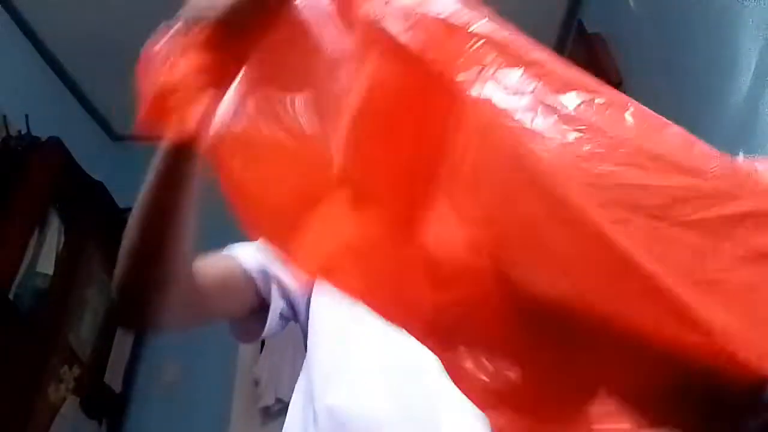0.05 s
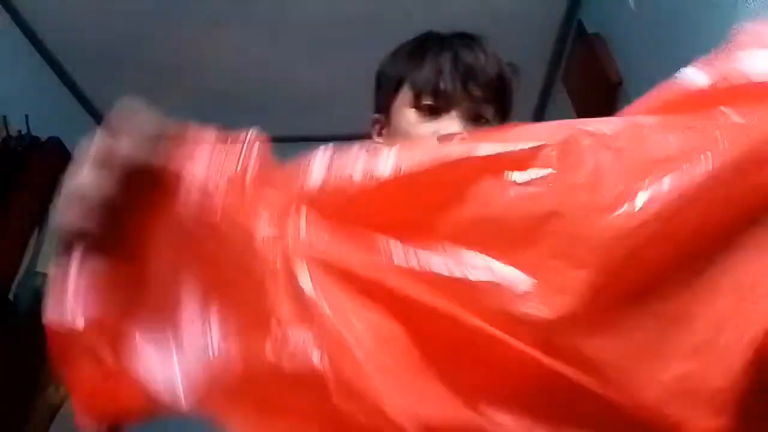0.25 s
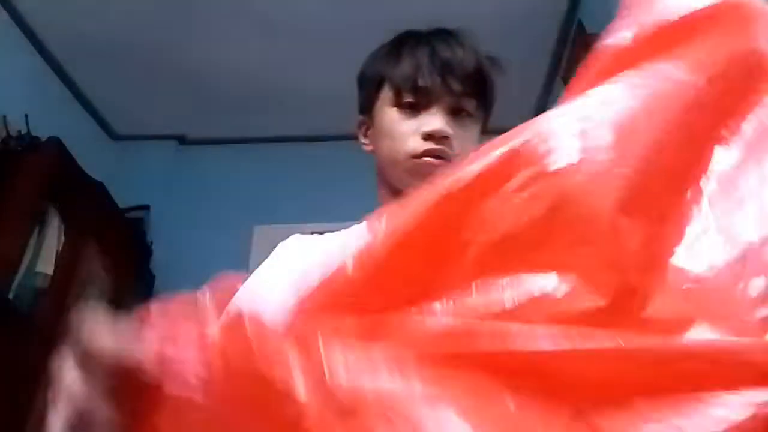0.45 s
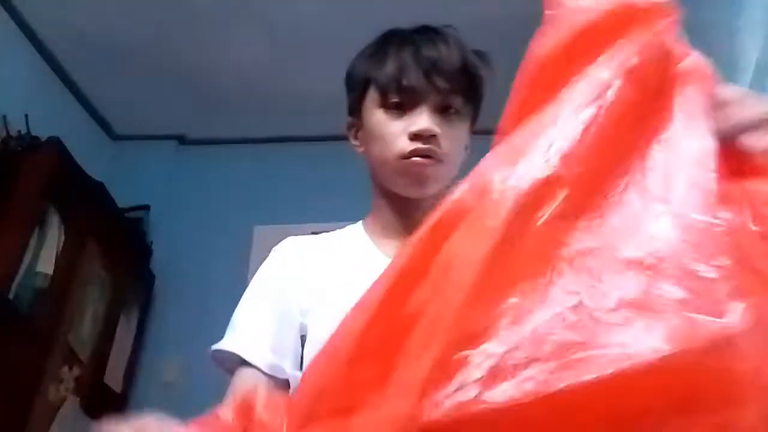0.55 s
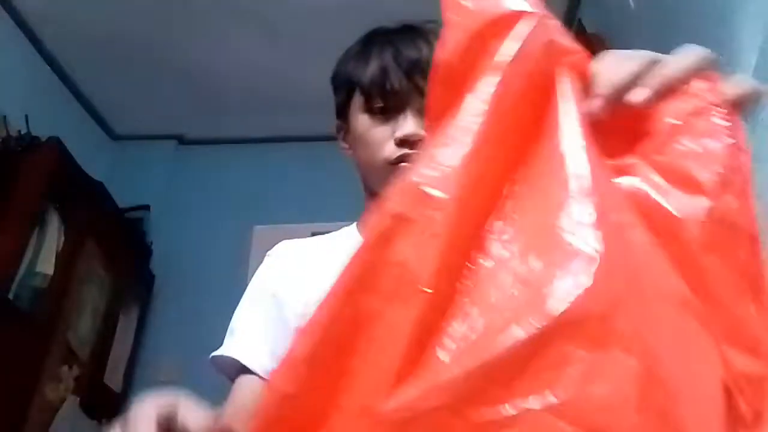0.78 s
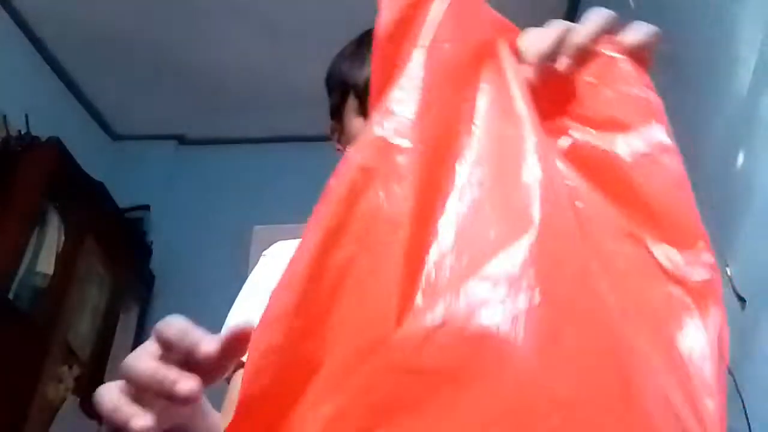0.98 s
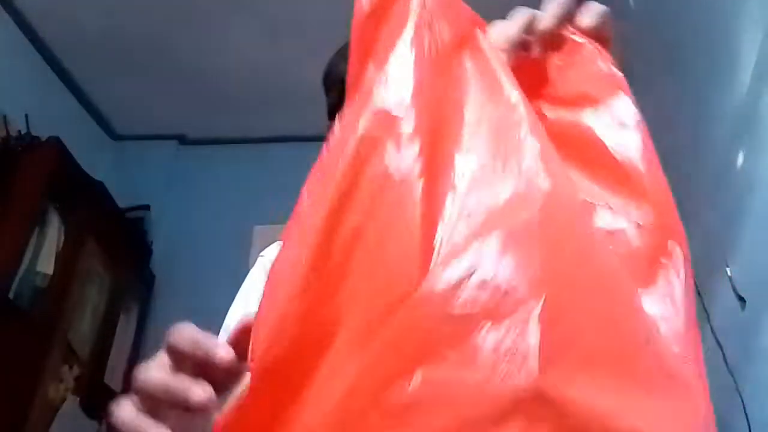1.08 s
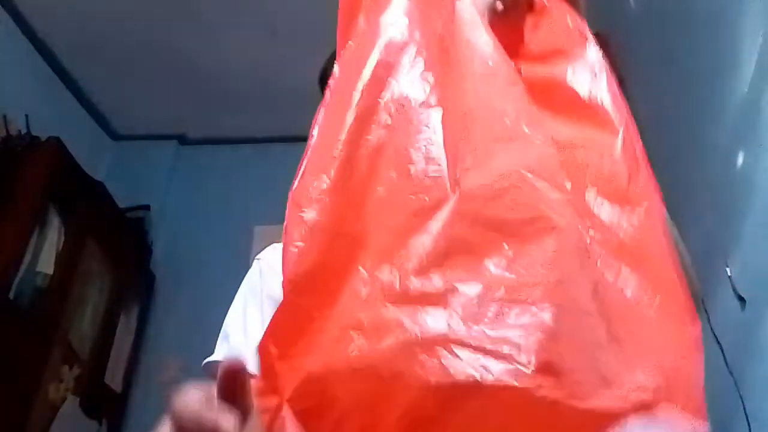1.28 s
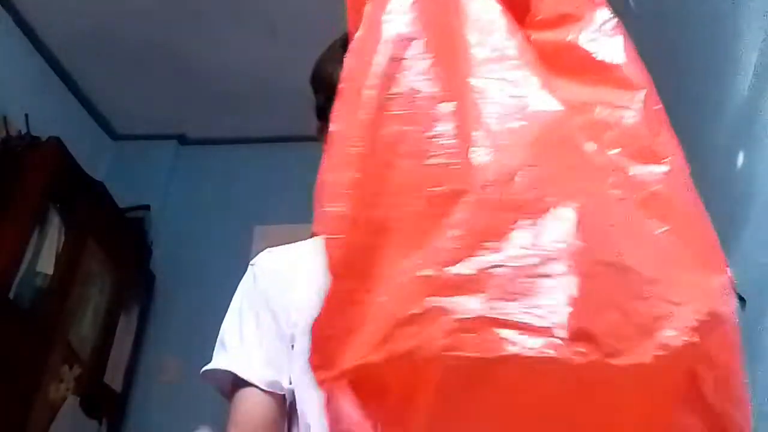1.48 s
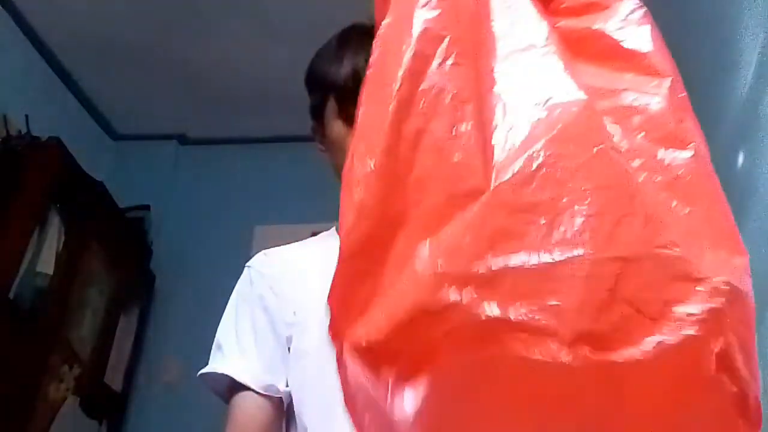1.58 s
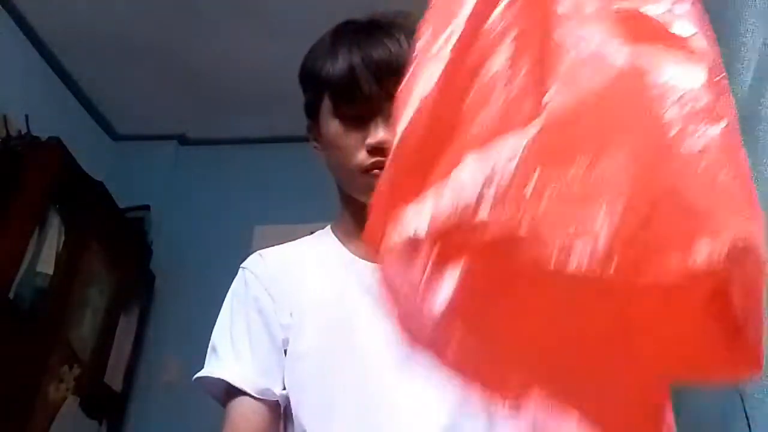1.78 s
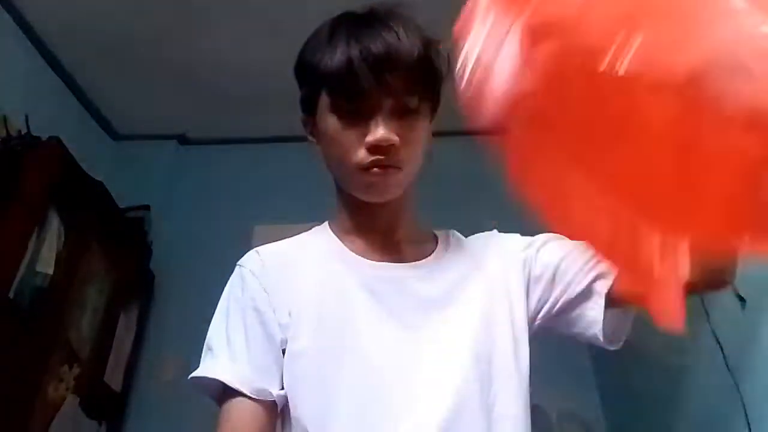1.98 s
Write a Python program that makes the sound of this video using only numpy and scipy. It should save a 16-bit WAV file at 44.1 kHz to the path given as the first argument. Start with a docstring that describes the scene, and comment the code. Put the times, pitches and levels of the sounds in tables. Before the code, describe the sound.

Large thin plastic bag rustled and snapped taut close to the microphone in a small room

```python
"""Thin plastic bag handled up close

A large thin plastic bag is swung, pulled open and lifted away close to the microphone in a small quiet room.
Showers of filtered noise grains make the rustle and crackle; single grains make sharp ticks.
Snapping panels are decaying sines that fall in pitch, each with a noise crack; low sines thump as the sheet flaps.
Low noise makes the puffs of air and the room rumble, a sine the hum; sparse decaying taps make the room answer."""
import sys
import numpy as np
from scipy import signal
from scipy.io import wavfile

SR = 44100
rng = np.random.default_rng(int(sys.argv[2]) if len(sys.argv) > 2 else 0)


def master_out(mix):
    """Clip the mix to full scale and print it as 16-bit PCM to the path in sys.argv[1]."""
    frames = np.transpose(np.atleast_2d(mix))
    ceiling = np.clip(frames, -1, 1)
    pcm = np.round(ceiling * 32767).astype(np.int16)
    wavfile.write(sys.argv[1], SR, pcm)


N = 90404

# Level tables are interpolated over time; spectra are relative, as their filters are scaled to unit energy.
# room rumble spectrum: freq_hz, density_db
RUMBLE_SPECTRUM = [(15, -15.5), (55, 0.5), (110, -0.5), (170, -8), (1000, -29), (4000, -42), (16000, -69)]
# hum: time_s, level_db
HUM_LEVEL = [(1.8, -58), (2.05, -44.5)]
# air pushed by the sheet: time_s, level_db
AIR_LEVEL = [(0, -57), (.21, -39.5), (.3, -51.5), (.35, -37), (.40, -59), (.475, -37.5), (.55, -41),
             (.62, -37), (.75, -37.5), (.83, -43.5), (1.22, -55.5), (1.36, -37), (1.41, -49), (1.46, -50),
             (1.53, -38), (1.68, -50)]
# air puff spectrum: freq_hz, density_db
PUFF_SPECTRUM = [(10, -10), (48, -0.5), (125, 0.5), (220, -15.5), (1500, -77.5)]
# room decay to -60 dB: freq_hz, t60_s
ROOM_DECAY = [(100, 0.17), (500, 0.48), (4000, 0.22)]
# room reflection spectrum: freq_hz, gain_db
ROOM_SPECTRUM = [(60, 2), (700, -0.5), (2400, -1), (6000, -10), (16000, 1.5)]
# handling of the bag, before the layer gains: time_s, rustle_relative_db, crackle_relative_db
HANDLING_LEVEL = [(0, -43.5, -53), (.12, -42.5, -54.5), (.21, -41.5, -39), (.30, -42.5, -50.5),
                  (.40, -39.5, -47.5), (.46, -31.5, -40), (.50, -36, -47.5), (.56, -34, -40),
                  (.615, -31, -38.5), (.645, -36.5, -38.5), (.68, -26.5, -39), (.73, -42.5, -47),
                  (.77, -51, -40), (.82, -44.5, -52.5), (.93, -39.5, -47), (1.0, -47.5, -47.5),
                  (1.13, -43.5, -47), (1.21, -48, -48), (1.3, -40.5, -49), (1.38, -43.5, -62),
                  (1.49, -47.5, -69), (1.55, -58.5, -63), (1.70, -69, -81.5), (1.80, -65, -80.5),
                  (1.835, -49.5, -65.5), (1.855, -67.5, -88.5), (2.05, -75, -100)]
# broad fold spectrum: freq_hz, density_db
RUSTLE_SPECTRUM = [(110, -6.5), (260, 3.5), (450, -3), (1150, -6), (1600, -3.5), (3400, -9), (4500, -24.5),
                   (7000, -24.5), (16000, -52.5)]
# fine wrinkle spectrum: freq_hz, density_db
CRACKLE_SPECTRUM = [(500, 10.5), (2000, 9), (4000, 6), (7000, -6.5), (8200, 1), (11000, -17), (13200, -23),
                    (15500, -11)]
# single creases flipping: start_s, level_db
TICK_EVENTS = [(0.134, -23.5), (0.176, -34), (0.1875, -31), (0.2131, -22), (0.2197, -28), (0.2487, -34),
               (0.2628, -25), (0.276, -29.5), (.388, -29), (0.438, -39), (.52, -27), (0.9106, -28.5),
               (0.919, -27.5), (1.0607, -26.5), (1.0993, -30), (1.229, -32), (1.5131, -39), (1.5405, -49),
               (1.7352, -51)]
# crease flip spectrum: freq_hz, density_db
TICK_SPECTRUM = [(200, -7), (1200, 13), (6500, -2.5), (8200, -4), (13000, -17), (15500, -9.5)]
# whole sheet flapping: start_s, level_db, pitch_hz
FLAP_EVENTS = [(0.679, -25, 282), (0.746, -19.5, 250), (1.2915, -24, 300), (1.356, -19, 301),
               (1.364, -28, 179), (1.401, -27, 56)]
# shaken film spectrum: freq_hz, density_db
SETTLE_SPECTRUM = [(100, -2), (400, 0), (1100, -2.5), (2000, 3), (3000, -8.5), (15000, -45)]
# panels snapping taut: start_s, pop_level_db, final_pitch_hz, ring_ms (to 1/e), crack_level_db
SNAP_EVENTS = [(0.3489, -26, 1340, 3.2, -25), (.605, -21, 1870, 0.54, -26), (0.6184, -23, 2330, 1.5, -23),
               (0.6761, -4.5, 1820, 1.5, -11.5), (0.6819, -9.5, 1630, 1.4, -27),
               (0.6993, -9, 1360, 1.2, -35), (0.7411, -12, 920, 1.5, -32), (0.7422, -9, 1410, 1.8, -12.5),
               (0.747, -1.5, 2300, 0.81, -12.5), (0.7482, 3, 1413, 1.54, -21),
               (0.7632, -12.5, 2570, 1.8, -24), (0.842, -24, 1600, 1.2, -28), (0.845, -28, 1950, 1, -24),
               (1.239, -23.5, 1620, 2.4, -40), (1.290, -6.5, 1280, 0.46, -25),
               (1.3317, -12, 1330, 0.3, -39), (1.3405, -18.5, 1100, 0.62, -35.5),
               (1.354, -7, 1630, 1.2, -19), (1.356, -11, 890, 1.45, -43), (1.375, -21, 1630, 2.7, -45),
               (1.3835, -24, 1730, 3.7, -32), (1.427, -18, 900, 0.77, -28), (1.44, -27, 2900, 2.2, -35),
               (1.4477, -28, 1440, 4.8, -32), (1.5183, -16, 1500, 2.4, -17), (1.531, -10, 1050, 0.62, -25),
               (1.6033, -34, 473, 2.8, -47), (1.66, -43, 850, 2.3, -54), (1.877, -43.5, 850, 2.15, -56),
               (1.9848, -44, 1740, 2.6, -47.5)]
# snap crack spectrum: freq_hz, density_db
CRACK_SPECTRUM = [(100, -30), (400, -1), (800, 4), (2000, 1), (5000, -11.5), (6500, -26.5), (8300, -19.5),
                  (12000, -44)]

# Decay, grain and sag times are to 1/e.
RUMBLE_DB, HUM_HZ = -50.5, 144.3
ROOM_DB, ROOM_DELAY_S, ROOM_TAPS_PER_S = -13, 0.010, 3000
POP_ROOM_DB = -7  # pops are aimed at the microphone and stir the room less
NEAR_DB, NEAR_DECAY_S = -5, 0.00078
RUSTLE_PER_S, RUSTLE_SPREAD_DB, RUSTLE_GRAIN_S, RUSTLE_GAIN_DB = 4200, 4.5, 0.00051, 3
CRACKLE_PER_S, CRACKLE_SPREAD_DB, CRACKLE_GRAIN_S, CRACKLE_GAIN_DB = 2600, 3.5, 0.00022, 5
SETTLE_PER_S, SETTLE_SPREAD_DB, SETTLE_GRAIN_S = 1300, 5, 0.00075
SETTLE_GAIN_DB, SETTLE_DECAY_S = -23, 0.021
TICK_DECAY_S, CRACK_DECAY_S, POP_RISE_S = 0.002, 0.0027, 0.000067
THUMP_DECAY_CYCLES = 1.46
POP_SHARP_RATIO, POP_SAG_S = 0.16, 0.00083  # initial pitch excess, lost as the tension lets go
CUT_HZ = 15700


def amp(db):
    """Decibels to gain."""
    return 10 ** (np.asarray(db) / 20)


def unit(x):
    """Scales to rms 1."""
    return x / np.sqrt(np.mean(x ** 2) + 1e-20)


def at_hz(points, hz):
    """Interpolates a frequency table on a log-frequency axis."""
    freq_hz, value = np.transpose(points)
    return np.interp(np.log(hz + 1), np.log(freq_hz + 1), value)


def level(table, axis):
    """Gain over time from one dB column of a table."""
    rows = np.array(table)
    time_s = np.arange(N) / SR
    return amp(np.interp(time_s, rows[:, 0], rows[:, axis]))


def add(mix, start_s, sound):
    """Mixes a sound in at start_s."""
    start = max(round(start_s * SR), 0)
    part = mix[start:][:len(sound)]
    part += sound[:len(part)]


def colour(x, points, size=8192):
    """Minimum-phase filter of unit energy with the given spectrum."""
    hz = abs(np.fft.fftfreq(size, 1 / SR))
    log_gain = np.log(amp(at_hz(points, hz)))
    response = np.exp(np.conj(signal.hilbert(log_gain)))
    taps = np.fft.ifft(response).real[:size // 2]
    return signal.fftconvolve(x, taps / np.linalg.norm(taps))[:len(x)]


def bursts(count, decay_s, size=1024):
    """Short random rattles of film: decaying noise, each different, all of the same energy."""
    fade = np.exp(-np.arange(size) / SR / decay_s)
    noise = rng.standard_normal((count, size)) * fade
    return noise * np.linalg.norm(fade) / np.linalg.norm(noise, axis=1, keepdims=True)


def creases(per_s, spread_db, grain_s, spectrum, count=32):
    """A shower of tiny bucklings, many small and a few large, drawing on a set of different grains."""
    size_db = spread_db * np.minimum(rng.exponential(1, N), 4.5)
    sizes = amp(size_db) * (rng.random(N) < per_s / SR)
    which = rng.integers(0, count, N)
    shower = np.zeros(N)
    for k, grain in enumerate(bursts(count, grain_s)):
        shower += signal.oaconvolve(sizes * (which == k), grain)[:N]
    return unit(colour(shower, spectrum))


def background():
    """Low room rumble from filtered noise, with a faint steady-pitched hum that rises at the end."""
    rumble = unit(colour(rng.standard_normal(N), RUMBLE_SPECTRUM))
    hum = unit(np.sin(2 * np.pi * HUM_HZ * np.arange(N) / SR))
    return amp(RUMBLE_DB) * rumble + level(HUM_LEVEL, axis=1) * hum


def room(x, size=256):
    """Small-room reflections: sparse random taps, each frequency fading at its own rate, mids longest."""
    taps = rng.standard_normal(SR // 2) * (rng.random(SR // 2) < ROOM_TAPS_PER_S / SR)
    hz, time_s, bins = signal.stft(taps, SR, nperseg=size)
    fade_db = -60 * time_s / at_hz(ROOM_DECAY, hz)[:, None]
    faded = signal.istft(bins * amp(fade_db), SR, nperseg=size)[1]
    tail = colour(faded, ROOM_SPECTRUM)
    out = np.zeros(N)
    add(out, ROOM_DELAY_S, signal.fftconvolve(x, tail / np.linalg.norm(tail)))
    return out


def near_echoes(x):
    """The body and the wall close by scatter each snap within a few milliseconds."""
    taps = bursts(count=1, decay_s=NEAR_DECAY_S)[0]
    return signal.fftconvolve(x, taps / np.linalg.norm(taps))[:N]


def air():
    """The swinging sheet fans air at the microphone: low noise in puffs."""
    return unit(colour(rng.standard_normal(N), PUFF_SPECTRUM)) * level(AIR_LEVEL, axis=1)


def rustle():
    """Broad folds rustle dully and fine wrinkles crackle as the hands move the bag."""
    folds = creases(RUSTLE_PER_S, RUSTLE_SPREAD_DB, RUSTLE_GRAIN_S, RUSTLE_SPECTRUM)
    folds *= level(HANDLING_LEVEL, axis=1)
    wrinkles = creases(CRACKLE_PER_S, CRACKLE_SPREAD_DB, CRACKLE_GRAIN_S, CRACKLE_SPECTRUM)
    wrinkles *= level(HANDLING_LEVEL, axis=2)
    return amp(RUSTLE_GAIN_DB) * folds + amp(CRACKLE_GAIN_DB) * wrinkles


def ticks():
    """Single stiff creases flip with a bright click."""
    out = np.zeros(N)
    for (start_s, level_db), tick in zip(TICK_EVENTS, bursts(len(TICK_EVENTS), TICK_DECAY_S)):
        add(out, start_s, amp(level_db) * tick)
    return colour(out, TICK_SPECTRUM)


def flaps(size=4096):
    """The whole sheet is stopped short and gives a soft low thump, a sine that dies in a few cycles."""
    t, out = np.arange(size) / SR, np.zeros(N)
    for start_s, level_db, pitch_hz in FLAP_EVENTS:
        fade = np.exp(-pitch_hz * t / THUMP_DECAY_CYCLES)
        add(out, start_s, amp(level_db) * np.sin(2 * np.pi * pitch_hz * t) * fade)
    return out


def settling():
    """After each snap the shaken film crackles on and dies away; overlapping powers add."""
    t, power = np.arange(SR // 2) / SR, np.zeros(N)
    for start_s, pop_db, *_ in SNAP_EVENTS:
        add(power, start_s, (amp(pop_db) * np.exp(-t / SETTLE_DECAY_S)) ** 2)
    crackle = creases(SETTLE_PER_S, SETTLE_SPREAD_DB, SETTLE_GRAIN_S, SETTLE_SPECTRUM)
    return amp(SETTLE_GAIN_DB) * np.sqrt(power) * crackle


def snaps(size=2048):
    """A panel jerks taut: a short pop falling in pitch and a run of buckling creases."""
    t, pops, cracks = np.arange(size) / SR, np.zeros(N), np.zeros(N)
    rise = 1 - np.exp(-t / POP_RISE_S)
    run = np.exp(-t / CRACK_DECAY_S)
    noises = rng.standard_normal((len(SNAP_EVENTS), size))
    for (start_s, pop_db, pitch_hz, ring_ms, crack_db), noise in zip(SNAP_EVENTS, noises):
        # integral of the sagging pitch
        cycles = pitch_hz * (t + POP_SHARP_RATIO * POP_SAG_S * (1 - np.exp(-t / POP_SAG_S)))
        pop = np.sin(2 * np.pi * cycles) * np.exp(-t * 1000 / ring_ms)
        add(pops, start_s, amp(pop_db) * pop * rise)
        crack = colour(run * noise, CRACK_SPECTRUM)
        crack *= np.linalg.norm(run) / np.linalg.norm(crack)  # equal energy before level
        add(cracks, start_s, amp(crack_db) * crack)
    return pops, cracks


def scene():
    """The bag close by, its reflections and the room's background."""
    pops, cracks = snaps()
    film = rustle() + ticks() + cracks + settling() + flaps()
    near = amp(NEAR_DB) * near_echoes(pops + cracks)
    reflections = amp(ROOM_DB) * room(film + amp(POP_ROOM_DB) * pops)
    return (film + pops + near + reflections + air() + background())[None]


def record(dry):
    """Clips at full scale, then low-passes at CUT_HZ."""
    lowpass = signal.firwin(401, CUT_HZ, window=("kaiser", 8), fs=SR)
    return signal.oaconvolve(np.clip(dry, -1, 1), lowpass[None], "same")


dry = scene()
out = record(dry)
master_out(out)
```